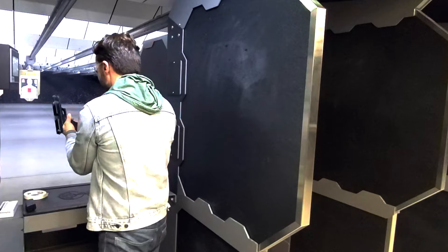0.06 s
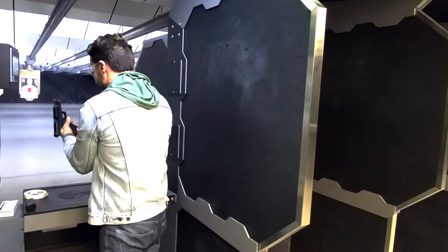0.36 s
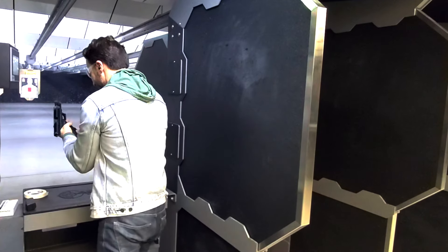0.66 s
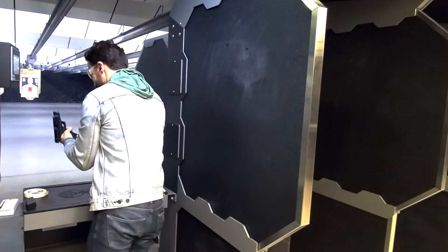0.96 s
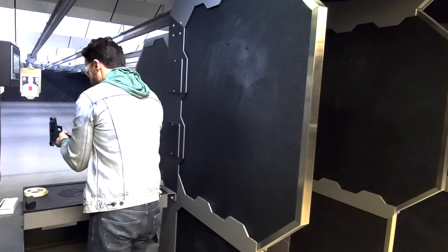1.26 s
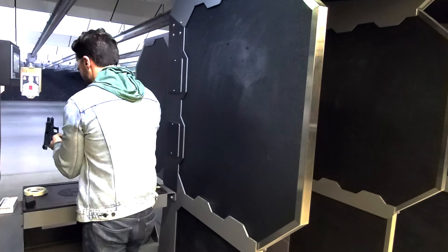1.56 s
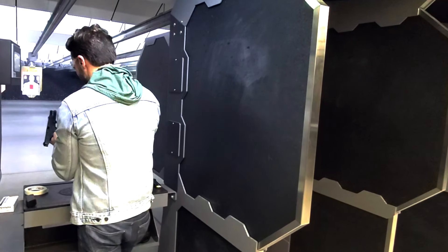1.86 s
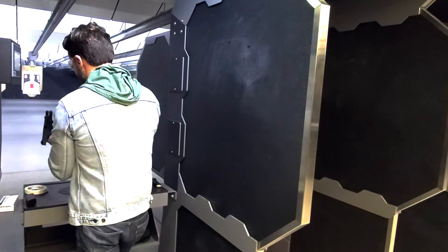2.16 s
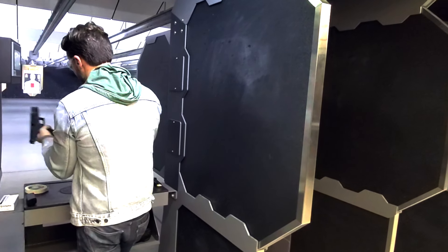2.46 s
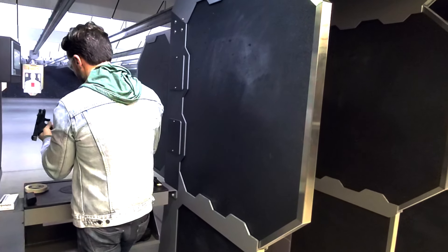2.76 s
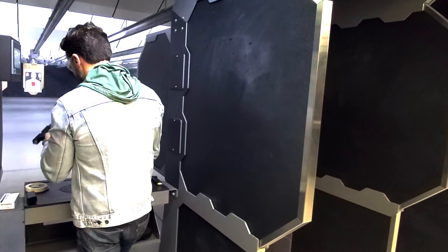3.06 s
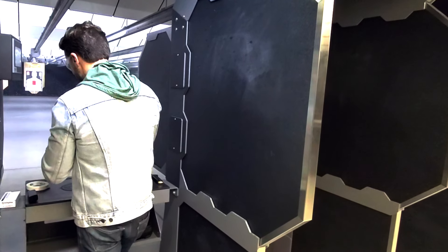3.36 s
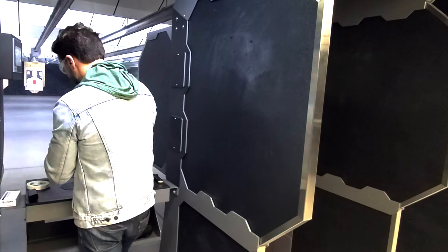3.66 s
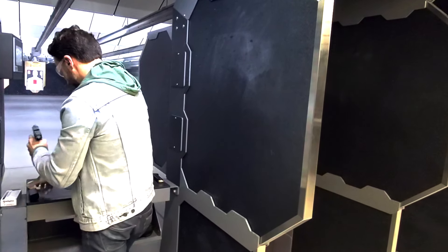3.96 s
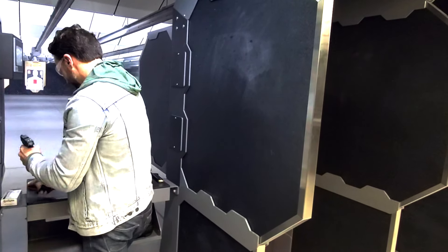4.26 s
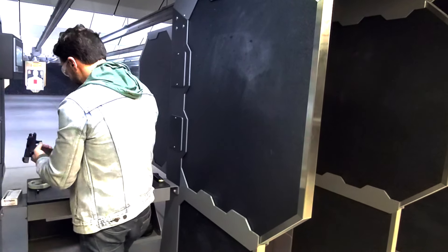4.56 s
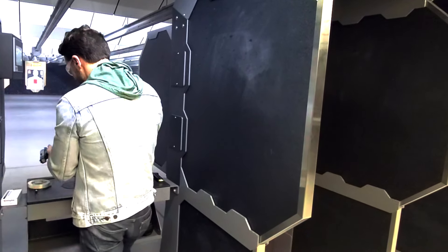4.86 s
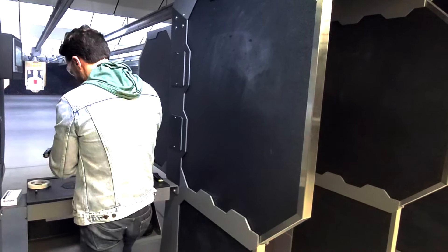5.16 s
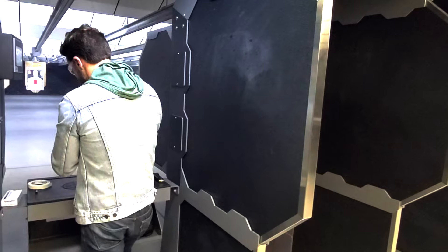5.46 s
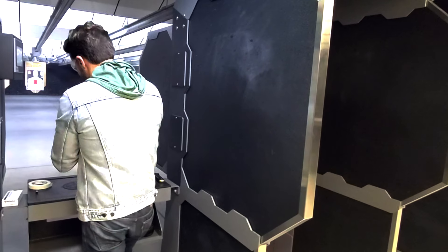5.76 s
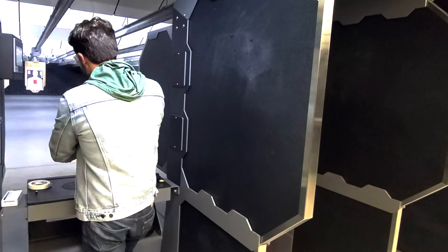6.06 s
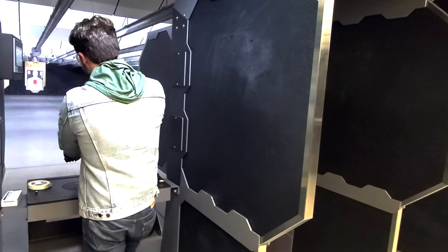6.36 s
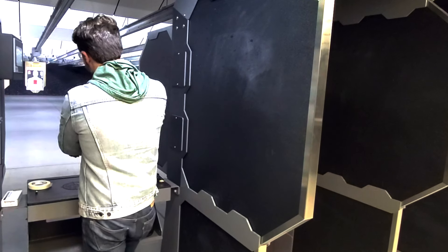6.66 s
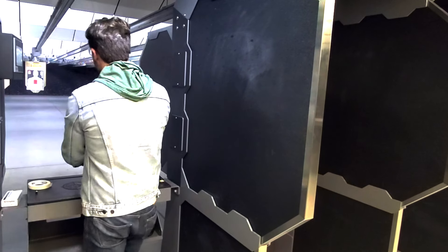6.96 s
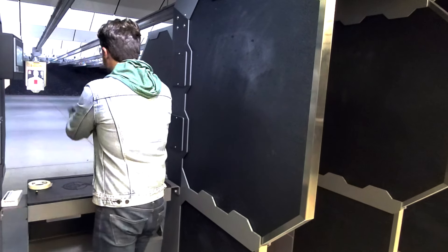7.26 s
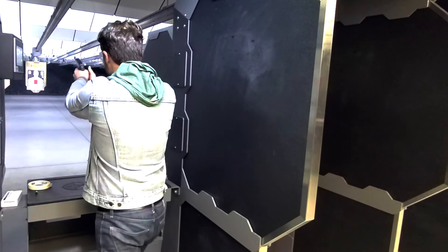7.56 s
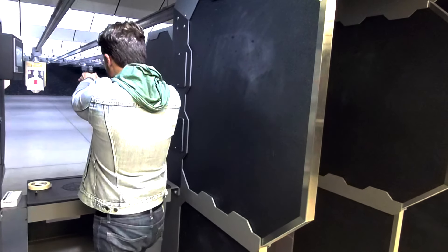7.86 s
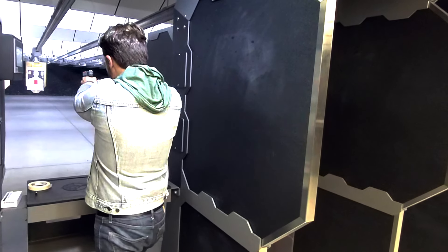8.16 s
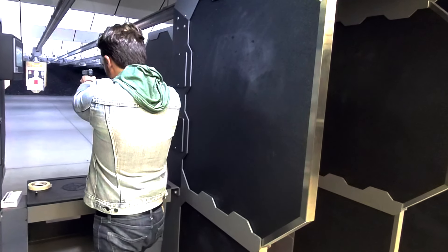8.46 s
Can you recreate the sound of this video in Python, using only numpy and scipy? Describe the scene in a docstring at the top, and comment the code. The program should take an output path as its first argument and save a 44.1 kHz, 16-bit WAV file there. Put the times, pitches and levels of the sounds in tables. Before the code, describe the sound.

Loud gunshots come at uneven intervals in a reverberant indoor range, bright cracks from one pistol mixing with deeper booms from another, each trailing a long, darkening echo. Beneath them are a low ventilation hum and the faint ping of brass cases on the floor. In the second half, a nearby pistol is loaded with small steel clicks and a slide scrape. A soft, dull knock and a brief low swell precede the last quick shots.

```python
"""Two pistols fire in other lanes of an indoor range, one heavy and booming, one light and sharp.
Each pressure blast cracks round the booth walls, roars between them, sets them ringing and dies away
down the concrete hall. Between shots, spent brass cases tinkle on the floor and the steel parts of a
pistol click and scrape as it is loaded close by. There is one dull knock and a brief low swell,
and the ventilation rumbles under it all."""
import sys
import numpy as np
from scipy import signal
from scipy.fft import rfft, irfft, next_fast_len
from scipy.io import wavfile
from scipy.ndimage import uniform_filter1d

SR = 44100
rng = np.random.default_rng(int(sys.argv[2]) if len(sys.argv) > 2 else 0)


def digitize_waveform(pressure):
    """Quantize a signal to 16-bit integers and store it at the path in sys.argv[1].

    Rows of a 2-D input are taken as channels; values are limited to [-1, 1].
    """
    field = np.atleast_2d(pressure).T
    bounded = np.clip(field, -1, 1)
    quanta = np.round(bounded * 32767).astype(np.int16)
    wavfile.write(sys.argv[1], SR, quanta)


N = 384993
TIME = np.arange(N) / SR

# The heavy pistol's shots. Each row: start in seconds, relative level in dB.
HEAVY_SHOT_CUES = [(.5555, -1.5), (2.928, -1.5), (4.902, -2.5), (6.7075, -1.5), (8.340, 0), (8.689, -0.5)]
# Its strongest blast paths. Each row: delay in seconds, left gain, right gain.
HEAVY_BLAST_PATHS = [(.0003, 0.54, .8), (.0011, 1.1, 0.29), (.0052, 1.2, 1.0)]
# The tone of its crack, booth roar and hall tail. Each row: frequency in Hz, relative level in dB.
HEAVY_CRACK_EQ = [(20, -37.5), (70, -3.5), (150, -2.5), (300, -18.5), (570, -7), (800, -12.5),
                  (1000, -12.5), (1250, -10.5), (1620, -14), (2300, -10), (4000, -27.5), (8000, -27),
                  (16000, -28)]
HEAVY_ROAR_EQ = [(29, -51.5), (50, -18), (213, -14.5), (428, -2.5), (729, -8), (950, -14), (1120, -11),
                 (1270, -16.5), (1400, -12), (3180, -20), (7570, -26.5), (8970, -28), (12600, -28),
                 (16000, -31.5)]
HEAVY_TAIL_EQ = [(29, -38), (50, -11.5), (91, -12.5), (125, -14), (298, -1), (337, -7.5), (398, 0.5),
                 (520, -4.5), (927, -17), (1470, -13.5), (3410, -26), (7390, -33), (8750, -40.5),
                 (12900, -44), (16000, -58.5)]


def heavy_pistol():
    """The booming pistol: a longer pressure push and a thick, slower roar."""
    def echoes():
        return [crack(HEAVY_CRACK_EQ, db=-13, rise_s=.0017, t60=.11),
                roar(HEAVY_ROAR_EQ, db=-9, rise_s=.016, hold_s=.046, treble_haste=.15,
                     slap_s=.019, slap_db=2, clump_db=-1.3),
                hall_tail(HEAVY_TAIL_EQ, db=-28, build_s=.099)]
    direct = [blast(HEAVY_BLAST_PATHS, push_s=.00054), booth_ring(lane=0)]
    return fire(HEAVY_SHOT_CUES, echoes, direct, variation=.38, pan_left_db=.3)


# The light pistol's shots; the first is already dying away as the scene opens.
# Each row: start in seconds, relative level in dB.
LIGHT_SHOT_CUES = [(-.28, 0.21), (1.1648, -.5), (2.218, 0), (3.2346, -.5), (4.0208, 0), (4.957, 0),
                   (5.8453, 0), (8.714, 0)]
# Its strongest blast paths. Each row: delay in seconds, left gain, right gain.
LIGHT_BLAST_PATHS = [(.0003, 0.43, .5), (.0041, 0.17, 0.39)]
# The tone of its crack, booth roar and hall tail. Each row: frequency in Hz, relative level in dB.
LIGHT_CRACK_EQ = [(50, -13), (300, -18.5), (520, 0), (680, -0.5), (900, -6), (1600, -12), (1950, -2),
                  (2300, -8), (3400, -10.5), (5000, -15.5), (12000, -20), (16000, -19)]
LIGHT_ROAR_EQ = [(25, -45.5), (60, -26), (230, -19.5), (420, -7), (700, -13), (790, -18.5), (980, -18.5),
                 (1100, -15), (1750, -14), (2300, -15.5), (7400, -25), (9000, -27), (12300, -26),
                 (16000, -31.5)]
LIGHT_TAIL_EQ = [(29, -41.5), (50, -20.5), (79, 4), (125, -24.5), (193, -0.5), (258, -5.5), (306, 0.5),
                 (428, -2), (559, -3.5), (1050, -13), (1960, -10.5), (3330, -19), (7390, -28.5),
                 (13500, -39), (16000, -47.5)]


def light_pistol():
    """The sharp pistol: a very short push, a bright crack and a leaner roar."""
    def echoes():
        return [crack(LIGHT_CRACK_EQ, db=-11, rise_s=.00059, t60=.083),
                roar(LIGHT_ROAR_EQ, db=-16, rise_s=.0051, hold_s=.045, treble_haste=.28,
                     slap_s=.033, slap_db=3.5, clump_db=.5),
                hall_tail(LIGHT_TAIL_EQ, db=-35, build_s=.08)]
    direct = [blast(LIGHT_BLAST_PATHS, push_s=.00014), booth_ring(lane=1)]
    return fire(LIGHT_SHOT_CUES, echoes, direct, variation=.36, pan_left_db=-.5)


def fire(shots, echoes, direct, variation, pan_left_db):
    """Shots from one lane share their echoes; muzzle gas and a shifting stance alter a part each time."""
    out, lane_echoes = np.zeros((2, N)), echoes()
    for start, db in shots:
        for shared, fresh in zip(lane_echoes, echoes()):
            add(out, start, amp(db) * (np.sqrt(1 - variation ** 2) * shared + variation * fresh))
        for layer in direct:
            add(out, start, amp(db) * layer)
    return out * amp([[pan_left_db / 2], [-pan_left_db / 2]])


def blast(paths, push_s):
    """The punch: a pressure jump and the suction after it, once for each strong path."""
    out, age = np.zeros((2, 2048)), TIME[:1024] / push_s
    wave = signal.lfilter(*signal.butter(2, 3500, fs=SR), (1 - age) * np.exp(-age))
    for delay, left, right in paths:
        add(out, delay, np.outer([left, right], wave))
    return out


def crack(colour, db, rise_s, t60):
    """The attack: the blast diffracts round the booth walls."""
    def envelope(t, hz):
        return (1 - np.exp(-t / rise_s)) * amp(-60 * t / t60)
    return amp(db) * echo_swarm(colour, envelope, size=4096)


# Decay between the booths. Each row: frequency in Hz, seconds to fall 60 dB.
BOOTH_DECAY = [(100, 0.6), (400, 0.2), (1500, 0.28), (4000, 0.25), (8000, 0.22), (15000, 0.18)]


def roar(colour, db, rise_s, hold_s, treble_haste, slap_s, slap_db, clump_db):
    """The body: echoes between the booths build, hold, then fall; the treble comes and goes sooner."""
    t = TIME[:16384]
    clumps = uniform_filter1d(rng.standard_normal(len(t)), size=100)  # reflections arrive in bunches
    slap = np.exp(-((t - slap_s) / .0065) ** 2)  # the back wall returns the blast
    bunching = amp(clump_db * clumps / clumps.std() + slap_db * slap)

    def envelope(t, hz):
        pace = (hz / 1000) ** treble_haste
        attack = 1 - np.exp(-(t * pace / rise_s) ** 2)
        fall = amp(-60 * (t - hold_s / pace) / read(BOOTH_DECAY, hz))
        return bunching * attack * fall / np.sqrt(1 + fall ** 2)
    return amp(db) * echo_swarm(colour, envelope, size=len(t))


# Booth resonances. Each row: pitch in Hz, peak time in seconds, then level in dB relative to the shot
# for the heavy pistol's lane and for the light pistol's lane.
BOOTH_RESONANCES = [(148.4, 0.014, -20, -30.5), (405, 0.025, -23, -18), (460, 0.035, -27.5, -27.5),
                    (581.5, 0.023, -24, -23.5), (750, .03, -31, -40.5), (810, .02, -34, -26),
                    (1080, .028, -20, -26), (1150, 0.026, -27.5, -38), (1375, 0.033, -26, -29.5),
                    (1483, 0.036, -30, -27.5), (1722, 0.017, -30.5, -23.5), (1936, 0.036, -26, -33.5),
                    (2560, .02, -42, -36.5)]


def booth_ring(lane):
    """Booth resonances swell and fade; the higher ones reach left and right out of step."""
    out, t = np.zeros((2, 16384)), TIME[:16384]
    for hz, peak_s, *lane_db in BOOTH_RESONANCES:
        swell = (t / peak_s * np.exp(1 - t / peak_s)) ** 2
        phase_split = np.arctan(amp(read(STEREO_WIDTH, hz))) * np.array([[1], [-1]]) * rng.choice([-1, 1])
        out += amp(lane_db[lane]) * swell * np.sin(2 * np.pi * (hz * t + rng.random()) + phase_split)
    return out


# Reverb time of the hall. Each row: frequency in Hz, seconds to fall 60 dB.
HALL_DECAY = [(60, 2.8), (250, 2.82), (500, 1.81), (1000, 1.63), (2000, 1.5), (4000, 1.22), (7000, 0.87),
              (11000, 0.52), (15000, .5)]


def hall_tail(colour, db, build_s, anchor_s=.22):
    """The long hall fills slowly and darkens as it fades; colour and level are set at anchor_s."""
    def envelope(t, hz):
        return (1 - np.exp(-(t / build_s) ** 2)) * amp(-60 * (t - anchor_s) / read(HALL_DECAY, hz))
    return amp(db) * echo_swarm(colour, envelope, size=73728)


# Loading clicks. Each row: start in seconds, level in dB, weight from 0 (light catch) to 1 (full slide).
LOADING_CLICKS = [(.518, -56, .4), (1.849, -58.5, .8), (2.024, -62, .5), (5.676, -42.5, .95),
                  (6.331, -56, .7), (6.564, -52, .8), (6.615, -32, .8), (7.537, -56, .1),
                  (7.574, -52.5, .3), (7.697, -43.5, .2), (7.8515, -45, .15), (7.977, -53.5, .15),
                  (8.0, -54, .2)]


def pistol_loading():
    """A pistol is loaded close by: short clicks and one pull on the slide, swelling up to its stop."""
    out = np.zeros((2, N))
    for start, db, weight in LOADING_CLICKS:
        add(out, *steel_click(start, db, weight, swell_s=.0013))
    add(out, *steel_click(snap_s=6.604, db=-38.5, weight=1, swell_s=.014))  # the slide
    return out


# The tone of the light catch and of the heavy slide. Each row: frequency in Hz, relative level in dB.
CATCH_EQ = [(1000, -32.5), (2200, -14.5), (3200, -41), (3900, -1), (5100, 0.5), (7600, -6.5), (9500, -7.5),
            (12000, -4), (15500, -18.5)]
SLIDE_EQ = [(600, -16.5), (1300, -7), (1900, -0.5), (3000, -0.5), (4000, 0.5), (5500, -5.5), (7200, -1.5),
            (9500, -4.5), (12000, -7), (15500, -4)]
# The pistol rings with every click. Each row: pitch in Hz, level in dB relative to the click.
PISTOL_MODES = [(3760, -16), (4530, -17), (5150, -15), (6000, -15), (7250, -18)]


def steel_click(snap_s, db, weight, swell_s, lead_s=.04, snap_t60=.01, echo_t60=.25, ring_t60=.18):
    """Steel scrapes, snaps home and pings in the booth, lower when heavier. Gives start and sound."""
    t = TIME[:16384] - lead_s
    before, after = np.minimum(t, 0), np.maximum(t, 0)
    steel = np.sqrt(1 - weight) * noise(CATCH_EQ, len(t)) + np.sqrt(weight) * noise(SLIDE_EQ, len(t))
    scrape = np.exp(before / swell_s)
    snap, echo = amp(3 - 60 * after / snap_t60), amp(-4 - 60 * after / echo_t60)
    modes = sum(amp(mode_db) * ping(hz, width_hz=230, size=len(t)) for hz, mode_db in PISTOL_MODES)
    ring = (t > 0) * amp(-60 * after / ring_t60) * modes
    return snap_s - lead_s, amp(db) * (scrape * (snap + echo) * steel + ring)


# Cases hit the floor. Each row: start in seconds, relative ring level in dB, ring pitch in Hz.
CASE_DROPS = [(1.8734, -59, 9930), (3.6661, -56, 9800), (3.8851, -60, 11700), (4.4782, -65, 11800),
              (4.6578, -61, 11900), (4.7441, -53, 11900), (6.1884, -62, 9820), (7.3023, -61, 11800),
              (7.4774, -61, 11800), (7.5388, -47, 9710), (7.6635, -58, 11800), (8.0391, -62, 11800),
              (8.1364, -60, 9780), (8.2566, -53, 9790)]
# A case's two modes. Each row: high ring pitch in Hz, matching low pitch in Hz.
CASE_MODE_PAIRS = [(9800, 3880), (11850, 5300)]
# Level of the ring by pitch: the 9.8 kHz ring is lifted and the 11.85 kHz ring is softened.
# Each row: ring pitch in Hz, level trim in dB.
CASE_RING_TRIM = [(9800, 1), (11850, -5)]


def spent_cases(contact_db=-65, ring_t60=.41, low_t60=.18, clink_t60=.23):
    """A tumbling brass tube rings in a fluttering high mode and a rough low one, over a short clink."""
    out, t = np.zeros((2, N)), TIME[:16384]
    clink_eq = [(2000, -46), (3800, -11), (5300, 1), (7000, -2), (15000, -15.5)]
    for start, db, hz in CASE_DROPS:
        high = ping(hz, width_hz=140, size=len(t)) * amp(-60 * t / ring_t60)
        low = ping(read(CASE_MODE_PAIRS, hz), width_hz=700, size=len(t)) * amp(-60 * t / low_t60)
        clink = noise(clink_eq, len(t)) * amp(-60 * t / clink_t60)
        add(out, start, amp(db + read(CASE_RING_TRIM, hz)) * high / 2)
        # Every case falls from about the same height, so the contact is always as loud.
        add(out, start, amp(contact_db) * (low + clink))
    return out


def knock(start_s=8.079, db=-39.5, rise_s=.001, t60=.21):
    """One dull knock somewhere in the booths."""
    out, t = np.zeros((2, N)), TIME[:16384]
    colour = [(100, -8.5), (450, 15.5), (900, 1), (1300, -9.5), (2500, -15), (7000, -35), (15000, -49)]
    envelope = (1 - np.exp(-t / rise_s)) * amp(db - 60 * t / t60)
    add(out, start_s, envelope * noise(colour, len(t)))
    return out


def low_swell(peak_s=8.24, span_s=.18, db=-44):
    """A low rumble swells briefly before the last shots."""
    colour = [(40, -30), (75, 2), (130, -1), (200, -14), (400, -38), (2000, -80)]
    swell = np.exp(-((TIME - peak_s) / span_s) ** 2)
    return amp(db) * swell * noise(colour, next_fast_len(N))[:, :N]


# The tone of the air in the ducts. Each row: frequency in Hz, relative level in dB.
DUCT_EQ = [(12, -22), (25, -6.5), (60, -2.5), (100, -6), (150, -8), (290, -10), (400, -13), (550, -21),
           (900, -32), (1400, -33.5), (2000, -37.5), (3000, -47.5), (7000, -48.5), (16000, -74.5)]
# Fan hum. Each row: pitch in Hz, level in dB around which it wavers.
FAN_TONES = [(71, -52.3), (262, -57.5)]


def ventilation(duct_db=-48):
    """The bed: steady duct rumble with two unsteady fan tones."""
    out = amp(duct_db) * noise(DUCT_EQ, next_fast_len(N))[:, :N]
    knots = np.linspace(0, TIME[-1], num=70)
    for hz, db in FAN_TONES:
        phase_drift = np.interp(TIME, knots, np.cumsum(rng.standard_normal(len(knots))))
        waver = np.interp(TIME, knots, rng.standard_normal(len(knots)))
        out += amp(db) * (1 + waver) * np.sin(2 * np.pi * hz * TIME + phase_drift)
    return out


# Width at two microphone ports a hand apart. Each row: frequency in Hz, side minus mid level in dB.
STEREO_WIDTH = [(60, -11), (200, -12), (380, -7.5), (700, -3), (1290, 2.5), (2000, -.5), (4400, .5),
                (15000, 0)]


def noise(colour, size):
    """Diffuse stereo sound with a mid rms of 1: narrow in the bass, wide in the treble."""
    hz = np.fft.rfftfreq(size, 1 / SR)
    mid, side = np.exp(2j * np.pi * rng.random((2, len(hz)))) * amp(read(colour, hz))
    mid, side = irfft(mid, size), irfft(side * amp(read(STEREO_WIDTH, hz)), size)
    return np.array([mid + side, mid - side]) / mid.std()


def echo_swarm(colour, envelope, size, bands=18):
    """Dense echoes; each band follows envelope(t, hz) and carries its due share of energy."""
    hz, t = np.fft.rfftfreq(size, 1 / SR), TIME[:size]
    spectrum, out = rfft(noise(colour, size)), np.zeros((2, size))
    centres = np.geomspace(80, 15000, bands)
    for centre, share in zip(centres, np.eye(bands)):
        band = irfft(spectrum * np.interp(hz, centres, share), size)
        shape = envelope(t, centre)
        shaped, due_power = band * shape, np.mean(band ** 2) * np.mean(shape ** 2)
        out += shaped * np.sqrt(due_power / (np.mean(shaped ** 2) + 1e-30))
    return out


def ping(hz, width_hz, size):
    """A rough metal ring: a tight cluster of partials round one pitch."""
    peak = [(max(hz - 8 * width_hz, 1), -70), (hz - width_hz, -20), (hz, 0),
            (hz + width_hz, -20), (hz + 8 * width_hz, -70)]
    return noise(peak, size)


def amp(db):
    """Decibels to gain."""
    return 10 ** (np.asarray(db) / 20)


def read(curve, hz):
    """Reads a curve on a log-frequency axis."""
    frequencies, values = np.transpose(curve)
    return np.interp(np.log(hz + 1), np.log(frequencies + 1), values)


def add(mix, start_s, sound):
    """Lays a stereo sound into the mix, trimming any overhang."""
    start = round(start_s * SR)
    sound = sound[:, max(-start, 0):]
    part = mix[:, max(start, 0):][:, :sound.shape[1]]
    part += sound[:, :part.shape[1]]


def scene():
    """Both pistols over the small metal sounds, the knock and the low background."""
    shots = heavy_pistol() + light_pistol()
    return shots + spent_cases() + pistol_loading() + knock() + low_swell() + ventilation()


# Microphone colour. Each row: frequency in Hz, gain in dB.
MIC_EQ = [(20, -6), (40, 1.5), (58, -0.5), (1400, 1.5), (1950, 1.5), (2350, -2), (3400, 0), (7000, 1),
          (7700, 3), (8600, -6.5), (9800, -3), (11500, 0.5), (15500, 0)]
# Balance of its two ports. Each row: frequency in Hz, left minus right level in dB.
MIC_BALANCE = [(60, -3.5), (110, 2.5), (200, -0.5), (380, -1.0), (700, -1.0), (1290, 1), (2380, 3.5),
               (4400, -1), (8120, 1), (15000, -4.5)]


def record(dry, cutoff_hz=15900):
    """Microphone colour, soft overload on the peaks, then a steep low-pass."""
    size = next_fast_len(N + 4096)
    hz = np.fft.rfftfreq(size, 1 / SR)
    port_gains = amp(read(MIC_EQ, hz) + np.outer([.5, -.5], read(MIC_BALANCE, hz)))
    coloured = irfft(rfft(dry, size) * port_gains, size)[:, :N]
    low_pass = signal.firwin(511, cutoff_hz, window=("kaiser", 9), fs=SR)
    return signal.oaconvolve(np.tanh(coloured), low_pass[None], "same")


dry = scene()
out = record(dry)
digitize_waveform(out)
```